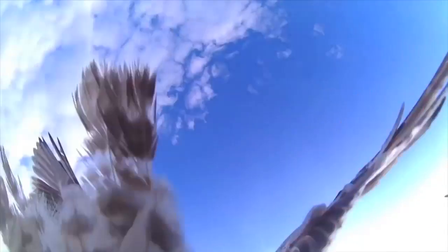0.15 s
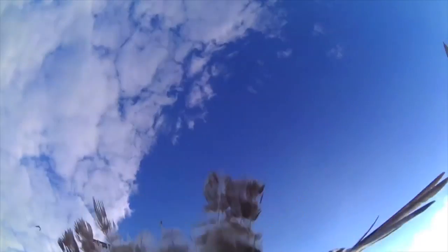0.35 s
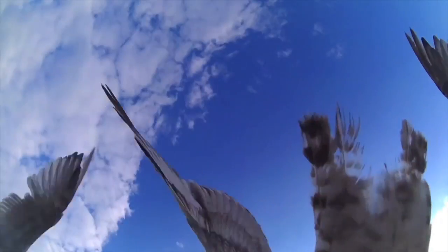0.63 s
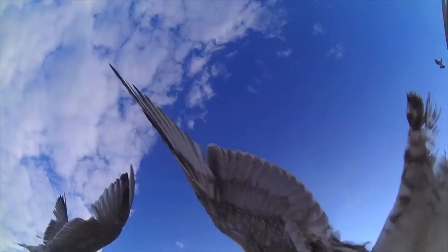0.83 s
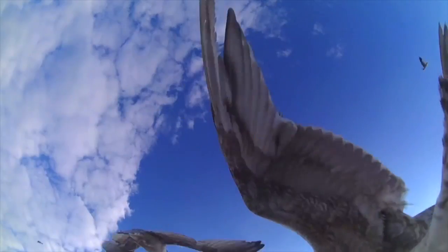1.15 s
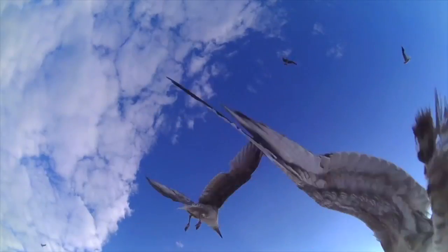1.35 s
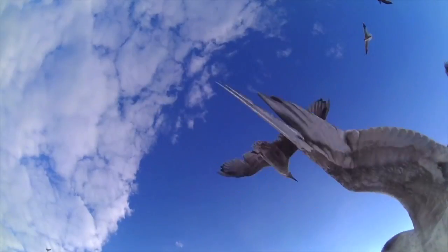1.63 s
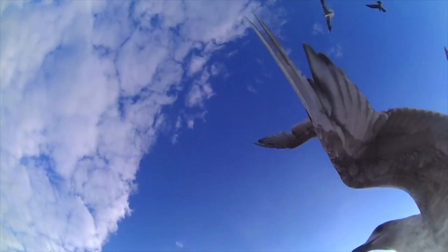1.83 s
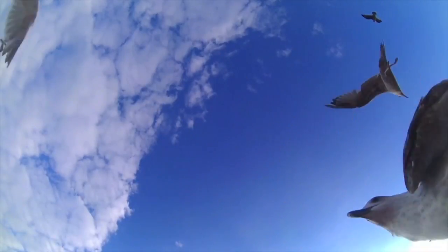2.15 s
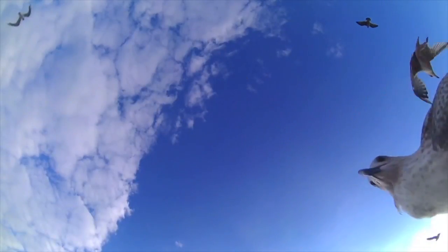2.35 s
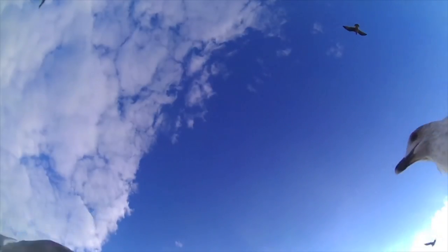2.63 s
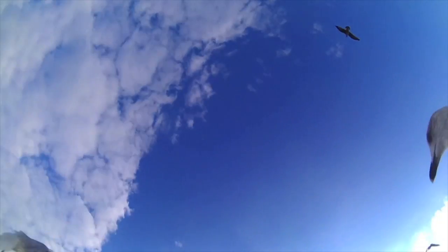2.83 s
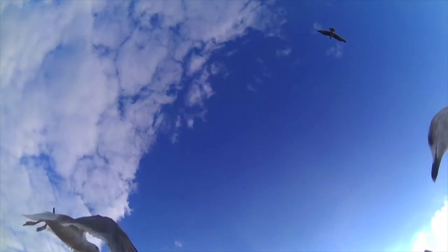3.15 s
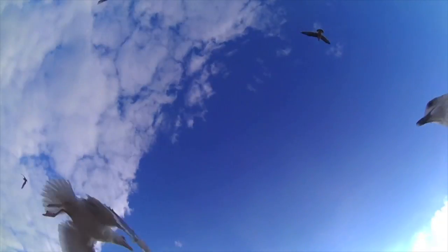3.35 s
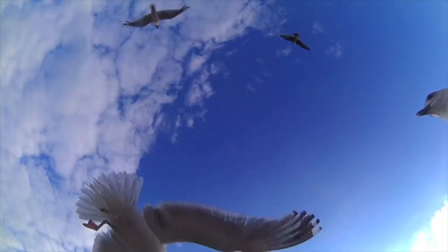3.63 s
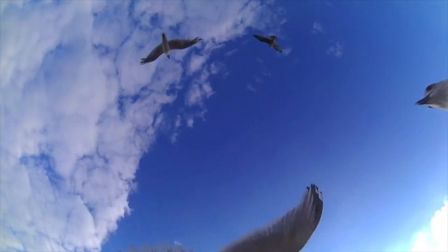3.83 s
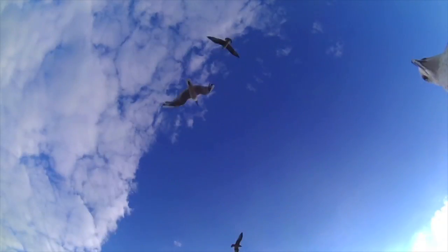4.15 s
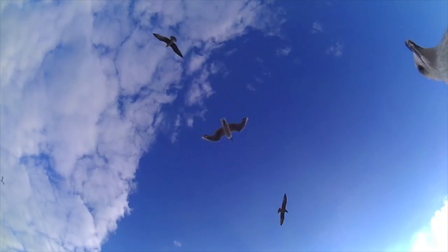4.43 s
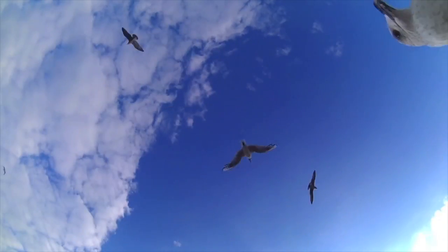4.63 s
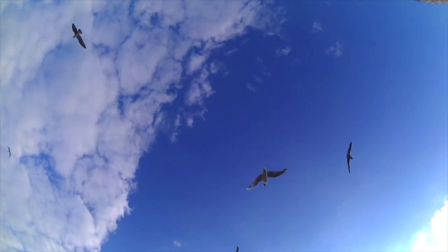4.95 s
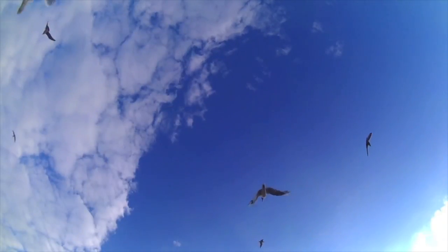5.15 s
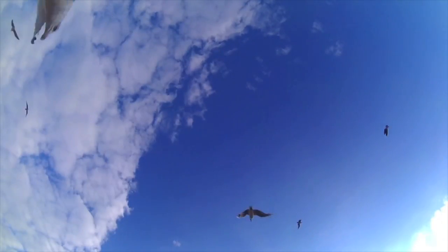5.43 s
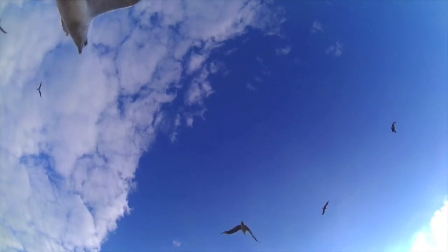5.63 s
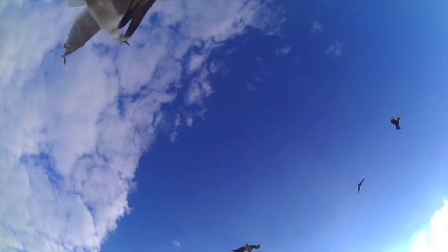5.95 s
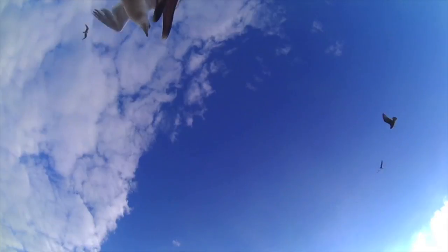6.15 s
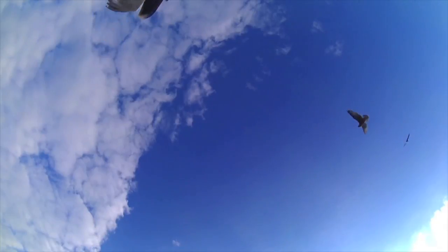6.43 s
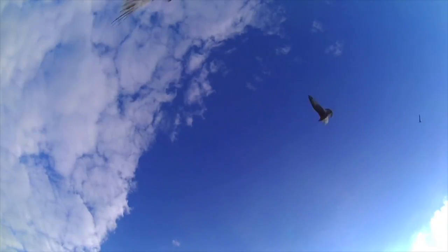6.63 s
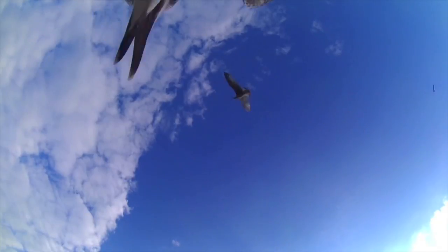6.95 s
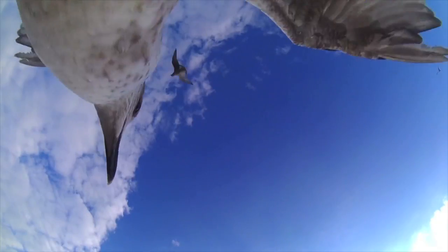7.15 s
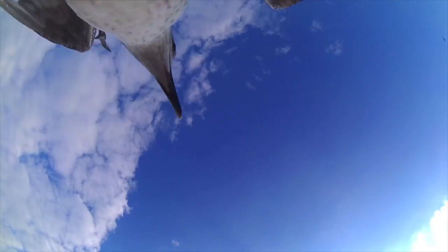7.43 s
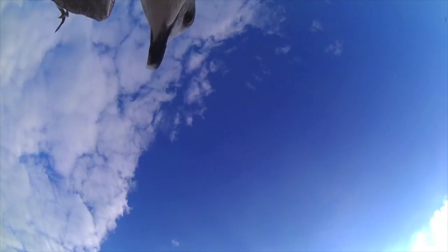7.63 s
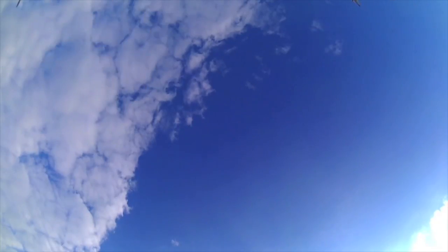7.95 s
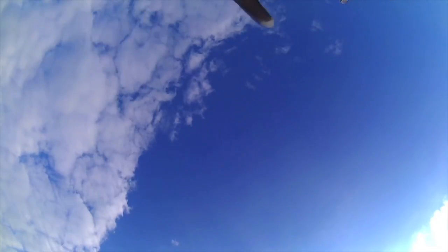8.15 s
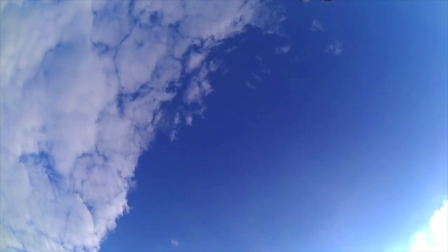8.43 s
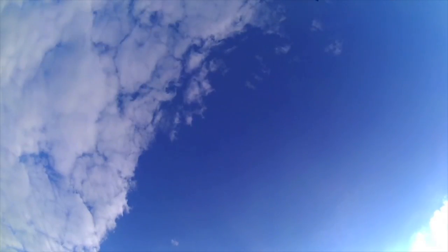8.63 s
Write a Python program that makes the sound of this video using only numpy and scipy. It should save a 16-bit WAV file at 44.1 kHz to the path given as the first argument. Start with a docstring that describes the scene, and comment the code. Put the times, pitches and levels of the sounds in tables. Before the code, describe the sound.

Young gulls whistle and chatter close overhead, over low wind and wing beats, with a few knocks on the microphone.

```python
"""Thin whistles from young gulls hovering close by, and two bursts of hard gull chatter.
A bird's voice box makes the whistles as near-pure tones and the chatter as pulses shaped by its throat.
Below the birds a small camera lies outdoors, facing the sky: a beak raps its case once, and a few
bumps make it thud and buzz. Wind and wing beats make the case hum low, over a faint electronic hiss."""
import sys
import numpy as np
from scipy import signal
from scipy.fft import rfft, irfft, next_fast_len
from scipy.io import wavfile
from scipy.ndimage import uniform_filter1d

SR = 44100
rng = np.random.default_rng(int(sys.argv[2]) if len(sys.argv) > 2 else 0)


def output_pcm(signal):
    """Save a mono or channel-first signal as 16-bit PCM at the path in sys.argv[1].

    Samples are clipped to [-1, 1] before scaling.
    """
    pcm = np.clip(np.atleast_2d(signal).T, -1, 1) * 32767
    wavfile.write(sys.argv[1], SR, np.round(pcm).astype(np.int16))


N = 387638
TIME = np.arange(N) / SR


def gulls(whistle_gain_db=2.5, squeal_gain_db=3.0):
    """All the birds' calls: begging whistles, peeps, one loud squeal and the chatter."""
    # begging calls: start t/s, climb t/s, high t/s, low t/s, opening f/Hz, scoop f/Hz, top f/Hz,
    # low f/Hz, climb level/dB, high level/dB, low level/dB, climb roughness/0-1, later roughness/0-1
    begs = [ (0.341, 0.11, 0.17, 0.050, 2970, -130, 4620, 3820, -48.5, -67, -62, 0.88, 0.37),
            (1.7, 0.1, 0.41, 0.17, 2930, 3, 4720, 3824, -52, -61.5, -48, 0.67, 0.015),
            (3.432, 0.098, 0.466, 0.066, 2870, -4, 4730, 3790, -51, -64, -55, 0.83, 0.1),
            (4.445, 0.085, 0.352, 0.055, 2860, 3, 4900, 4100, -66, -83.5, -67.5, 0.8, 0.75),
            (7.132, 0.094, 0.362, 0.127, 4340, 442, 4540, 3700, -60, -61, -62, 0.01, 0.1)]
    # the flock's peeps: start t/s, length t/s, first f/Hz, last f/Hz, level/dB, roughness/0-1
    peeps = [ (0.523, 0.033, 3750, 3850, -56.5, 0.7), (0.566, 0.036, 4330, 4230, -61, 0.5),
             (0.569, 0.036, 3700, 3660, -58, 0.3), (0.665, 0.049, 4120, 3850, -50.5, 0.07),
             (0.716, 0.036, 4860, 4800, -67, 0.35), (0.750, 0.058, 4380, 4390, -63, 0.45),
             (0.762, 0.032, 3610, 3660, -60, 0.25), (0.796, 0.044, 4050, 3950, -57.5, 0.7),
             (0.802, 0.040, 4380, 4230, -53, 0.56), (0.875, 0.060, 2750, 2580, -63, 0.75),
             (0.881, 0.11, 4400, 4520, -65, 0.9), (0.962, 0.030, 2570, 2430, -61, 0.2),
             (1.010, 0.075, 4130, 3900, -70, 0.2), (2.354, 0.150, 3048, 3110, -74, 0.16),
             (2.708, 0.088, 3700, 3720, -69, 0), (2.960, 0.220, 4500, 4300, -81, 0.2),
             (4.488, 0.069, 3080, 3270, -73, 0.4), (4.494, 0.055, 4120, 4250, -70, 0.85),
             (4.600, 0.160, 3080, 2980, -78, 0.4), (4.852, 0.070, 2900, 3260, -70, 0.4),
             (4.93, 0.022, 3840, 3890, -60, 0.1), (4.957, 0.4, 4530, 4320, -70.5, 0.2),
             (5.14, 0.050, 3000, 3140, -63, 0.3), (5.200, 0.13, 3520, 3360, -64, 0.15),
             (5.307, 0.08, 3700, 3650, -62, 0.2), (5.439, 0.028, 2800, 2740, -64, 0.3),
             (5.468, 0.039, 2730, 2610, -51.5, 0.03), (8.066, 0.023, 4000, 4190, -72, 0.6),
             (8.120, 0.160, 4280, 4000, -81, 0.4), (8.752, 0.038, 2920, 3100, -68, 0.65)]
    # chatter: start t/s, length t/s, level/dB, f/Hz, roughness/0-1, treble lift of the open beak/dB
    syllables = [ (0.155, 0.02, -60, 1850, .05, -15), (0.578, 0.026, -57, 2360, 0.26, 15),
                 (0.595, 0.018, -42.5, 2053, 0.23, 8.5), (0.607, 0.045, -43.5, 370, 0.09, 18.5),
                 (0.641, 0.026, -55, 2900, .01, 5), (0.835, 0.038, -48.5, 305, 0.53, 2),
                 (0.865, 0.022, -48, 364, 0.06, 15), (0.923, 0.021, -47, 377, 0.25, 14),
                 (0.937, 0.015, -40, 258, 0.6, -12), (0.969, 0.019, -51, 616, 0.1, -5),
                 (0.982, 0.031, -48, 346, 0.27, 10), (0.999, 0.031, -50.5, 1816, 0.1, 0),
                 (5.106, 0.023, -35.5, 3040, 0.03, 23.5), (5.48, 0.023, -38.5, 675, 0.14, 3.5),
                 (5.506, 0.039, -36.5, 1310, 0.07, 0.5), (5.551, 0.039, -36, 1271, 0.09, 2),
                 (5.595, 0.043, -33, 1224, 0.09, -1.5), (5.649, 0.047, -35, 275.3, 0.17, 0),
                 (5.693, 0.044, -34, 263.2, 0.03, 0.5), (5.734, 0.047, -36, 267.7, 0.32, -0.5),
                 (5.784, 0.039, -38.5, 253.5, 0.24, -3.5), (5.833, 0.029, -44.5, 254, 0.13, -7)]
    out = np.zeros(N)
    for course in [beg(*row) for row in begs] + [peep(*row) for row in peeps]:
        start, sound = whistle(course)
        add(out, start, amp(whistle_gain_db) * sound)
    start, sound = whistle(squeal())
    add(out, start, amp(squeal_gain_db) * sound)
    for start, *shape in syllables:
        add(out, start, chatter_syllable(*shape))
    return open_air(out)


def whistle(course, beat_hz=610):
    """A near-pure tone. When it is rough, the other side of the voice box beats against it."""
    times, *columns = np.transpose(course)  # a course lists t/s, f/Hz, level/dB, roughness/0-1
    t = np.arange(times[0], times[-1], 1 / SR)
    hz, db, rough = (np.interp(t, times, column) for column in columns)
    rough, count = np.clip(rough, 0, 1), len(t)
    beat = np.cos(2 * np.pi * np.cumsum(beat_hz * (1 + 0.073 * wander(count, 38.5))) / SR)
    shake = (0.0012 + 0.017 * rough) * wander(count, 260)
    phase = 2 * np.pi * np.cumsum(hz * (1 + shake)) / SR + 0.3 * rough * beat
    # the throat passes less of the overtone as the pitch climbs
    overtone_db = -25 - 50 * np.log2(hz / 3500) + 9 * np.minimum(rough, .3)
    tone = np.sin(phase) + amp(np.minimum(overtone_db, -12)) * np.sin(2 * phase)
    flutter = 1 + rough * (0.34 * beat + 0.42 * wander(count, 200))
    cracks_db = rough * (6 * np.tanh(wander(count, 68)) - 2)
    fade = signal.windows.tukey(count, min(1, 0.0051 * SR / count))
    return times[0], np.sqrt(2) * amp(db + cracks_db) * tone * flutter * fade


def beg(start, climb_s, high_s, low_s, open_hz, scoop_hz, top_hz, low_hz,
        climb_db, high_db, low_db, hoarse, rough, count=160):
    """A begging call's course: it climbs hoarsely, cracks to a thin high note, then drops lower."""
    # the high note flips up into a squeak and back: start t/s, length t/s
    flips = [(0.47, 0.03), (3.56, 0.05), (3.656, 0.037), (4.60, 0.21)]
    crack_hz, crack_s, step_hz = 3970, 0.00405, 421
    u = np.linspace(0, 1, count)  # progress through each of the three parts
    shake = unit(uniform_filter1d(rng.standard_normal(count), size=14))
    waver = unit(uniform_filter1d(rng.standard_normal(count), size=36))

    strain = hoarse * (1 - u ** 3)
    rise = open_hz + (crack_hz - open_hz) * u - scoop_hz * np.sin(np.pi * u) + 169 * strain * shake
    # a hoarse climb catches on evenly spaced steps of pitch
    rise -= 0.8 * hoarse * step_hz / (2 * np.pi) * np.sin(2 * np.pi * rise / step_hz)
    climb = [start + climb_s * u, rise, climb_db - 17 * np.sqrt(hoarse) * (1 - u ** 2), strain]

    t = crack_s + (high_s - 2 * crack_s) * u
    times = start + climb_s + t
    flipped = sum(1. * ((times > at) & (times < at + length)) for at, length in flips)
    flip = uniform_filter1d(flipped, size=3)
    sag = top_hz + (low_hz * 1.115 - top_hz) * u ** 0.8 + 24.1 * waver
    # the pitch reaches the top from just below, and rounds off into the drop
    sag *= 1 - 0.05 * np.exp(-t / 0.027) - 0.04 * np.exp((t - t[-1]) / 0.0087)
    swell_db = high_db - 11 * (u / 0.76 - 1) ** 2
    flip_db = flip * (10 - 64 * (1 - flip))  # the voice nearly cuts out on its way in and out of a flip
    high = [times, sag * 1.15 ** flip, swell_db + flip_db, rough + 0.27 * flip]

    fall = low_hz * (1 - 0.02 * u - 0.12 * u ** 7)
    fade_db = low_db - 2.5 * u - 27 * u ** 5
    low = [start + climb_s + high_s + low_s * u, fall, fade_db, np.full(count, rough)]
    return np.hstack([climb, high, low]).T


def peep(start, length, first_hz, last_hz, db, rough, count=12):
    """A peep's course: one glide that swells and fades, shaking in pitch if it is hoarse."""
    u = np.linspace(0, 1, count)
    hz = first_hz + (last_hz - first_hz) * u + 110 * rough * rng.standard_normal(count)
    swell_db = db - 3.5 * (2 * u - 1) ** 2
    return np.transpose([start + length * u, hz, swell_db, np.full(count, rough)])


def squeal(clear_db=-43.5, rough_per_db=0.2):
    """The closest bird's course: hoarser where it is weaker, and never clean once its voice breaks."""
    # the squeal before the break: t/s, f/Hz, level/dB
    clean = [(5.135, 3700, -65), (5.137, 3770, -59), (5.209, 4000, -52), (5.219, 4070, -44),
             (5.265, 3976, -36), (5.291, 3891, -36), (5.312, 3870, -42)]
    # and after the break: t/s, f/Hz, level/dB
    broken = [(5.312, 3240, -41.5), (5.33, 3240, -50), (5.336, 3250, -44), (5.346, 3210, -46),
              (5.354, 3280, -61), (5.378, 3200, -50), (5.426, 3180, -59), (5.44, 3190, -75)]
    times, hz, db = np.transpose(clean + broken)
    least_rough = np.repeat([0.04, 0.21], [len(clean), len(broken)])
    rough = np.clip((clear_db - db) * rough_per_db, least_rough, 0.7)
    return np.transpose([times, hz, db, rough])


def chatter_syllable(length, db, hz, rough, lift_db):
    """Voice box pulses, fast in a yelp and slow in a rattle, pass with puffs of air through the throat."""
    # how the gull's throat colours its voice: f/Hz, level/dB
    throat = [(650, -46), (1080, -22.5), (1320, -9), (1580, -17.5), (1870, 5), (2130, -6), (2420, -2.5),
              (2700, -18), (2940, -2.5), (3450, -30.5), (4050, -9.5), (4600, -25), (5200, -24),
              (9000, -59.5)]
    count = int(length * SR)
    u = np.linspace(-1, 1, count)
    force = signal.windows.tukey(count, min(1, 0.017 / length)).clip(0, 1)
    rattle = float(hz < 500)  # slow pulses are uneven, and sink in pitch and force as the air runs out
    arch = length * (1 / 8 - u ** 2)  # longer syllables arch further in pitch
    droop = (0.011 + 0.012 * rattle) * u
    cycles = np.cumsum(hz * (1 + arch - droop + 0.11 * rough * wander(count, 300))) / SR
    pulses = np.zeros(count)
    for k in range(1, int(8000 / hz) + 1 + (not rattle)):
        height = k * hz / 2200  # high overtones sound only at full force, and are the least steady
        strength = force ** height * amp(5.5 * min(height / 2, 1) * wander(count, 44))
        sweep = .0008 * (k * hz) ** 2 / 2000  # each pulse is a short upward sweep
        slip = rattle * 0.3 * height * wander(count, 90)
        pulses += strength * np.cos(2 * np.pi * (k * cycles - sweep) + slip)
    puffs = force * np.exp(-(cycles % 1) / .5) * rng.standard_normal(count)
    puffs = unit(puffs - 2.7 * np.gradient(np.gradient(puffs)))  # brightens the rasp
    drive = (1 - rough) * unit(pulses) + 0.97 * (1 + rattle) * rough * puffs
    drive *= amp(rattle * (wander(count, 230) - 4 * u))

    def throat_and_beak_db(f):
        """An open beak lifts the treble; a closing one dulls it and the middle tones too."""
        treble = lift_db * curve([(2900, 0), (3700, 1), (4400, 1.0), (6000, 0.8)], f)
        middle = 2.5 * min(lift_db, 0) * curve([(2100, 0.028), (2900, 1.0), (4000, 0.3)], f)
        return curve(throat, f) + treble + middle

    voice = colour(drive, throat_and_beak_db)
    return amp(db) * voice / np.sqrt(np.sum(voice ** 2) / count)


def open_air(x, echo_db=-25, decay_s=0.21):
    """Adds weak scattered echoes from the ground and nearby walls."""
    t = np.arange(SR // 2) / SR
    echoes = rng.standard_normal(len(t)) * (rng.random(len(t)) < 2000 / SR)
    echoes *= (t > .004) * amp(-60 * t / decay_s)
    return x + amp(echo_db) * signal.fftconvolve(x, echoes / np.linalg.norm(echoes))[:N]


def peck(top_hz=10800, snap_db=-20):
    """A hard beak raps the case: its shell rings, and the contact adds a thin snap on top."""
    # the shell's ringing tones: f/Hz, level/dB, time to fade by 60 dB/s
    shell_tones = [(1330, -14, 0.021), (1770, -9.5, 0.013), (2940, -6.5, 0.015), (3760, -0.5, 0.0044),
                   (4740, -3.5, 0.011), (6050, -5, 0.012), (7300, -3.5, 0.005), (8870, -2, 0.0074),
                   (10320, -7, 0.005)]
    # the two tips of the beak land: t/s, level/dB
    beak_tips = [(0.8404, -20), (0.8417, -29)]
    out = np.zeros(N)
    shell = ring(shell_tones[::2]) - ring(shell_tones[1::2])  # neighbouring tones swing opposite ways
    soft = signal.sosfilt(signal.butter(8, top_hz, fs=SR, output="sos"), shell)
    for start, db in beak_tips:
        add(out, start, amp(db) * (soft + amp(snap_db) * shell))
    return out


def bumps(thud_rise_s=0.0046, scuff_rise_s=0.0013):
    """Each bump rings the case with a thud and scuffs its surface."""
    # bumps: t/s, thud level/dB, scuff level/dB, scuff time to fade by 60 dB/s,
    # scuff tilt/dB per octave, scuff top f/Hz
    knocks = [ (0.006, -24, -45, 0.14, -2.5, 3000), (0.029, -29, -40, 0.037, -5, 2500),
              (0.503, -26, -81, .05, 1, 2500), (2.481, -38, -50, 0.053, -9, 6000),
              (2.510, -55, -49, 0.065, -10.5, 2500), (2.662, -30, -44, 0.11, -6, 6000),
              (3.278, -38.5, -70, .05, -3, 2520), (5.194, -40, -50, .1, -12, 2500),
              (6.953, -28.5, -45.5, 0.37, -6, 3000), (6.979, -29, -36, 0.26, -5.5, 11000),
              (7.054, -45, -38, 0.039, -2, 2490), (7.305, -43, -50, .15, -5, 4500),
              (7.817, -22.5, -35, 0.12, -8, 4020), (7.875, -39, -31.5, 0.011, 5, 3980),
              (7.928, -62, -39, 0.024, -0.5, 3760)]
    # the case's ringing tones: f/Hz, level/dB, time to fade by 60 dB/s
    case_tones = [(129, -30, 0.054), (225, 9.5, 0.052), (310, -5.5, 0.063), (456, -11, 0.05),
                  (537, -37, 0.01), (1830, -32.5, 0.078), (3020, -36.5, 0.11)]
    # the colour of a scuff: f/Hz, level/dB
    scuff_colour = [(150, -14), (450, 1.5), (900, -2), (1100, -4.5), (1350, 4.5), (1600, 1), (1870, -1.5),
                    (2400, -8.5), (3050, -17), (3500, -7), (4000, -7), (5200, -6), (9000, -14),
                    (15000, -25)]
    out, t = np.zeros(N), np.arange(SR // 4) / SR
    thud = 1.05 * ring(case_tones) * (1 - np.exp(-t / thud_rise_s))
    for start, thud_db, scuff_db, decay_s, tilt_db, top_hz in knocks:
        def shade_db(f):
            """This scuff's colour: tilted, and cut away above its top."""
            tilt = tilt_db * np.log2(np.clip(f, 400, 4500) / 1800)
            return curve(scuff_colour, f) + tilt - 45 * np.log2(np.clip(f / top_hz, 1, 2.5))

        scuff = unit(colour(rng.standard_normal(len(t)), shade_db)[:len(t)])
        envelope = amp(scuff_db - 60 * t / decay_s) * (1 - np.exp(-t / scuff_rise_s))
        add(out, start, amp(thud_db) * thud + envelope * scuff)
    return out


def buzzes(flicker_db=4.0):
    """During the last quick clatter of knocks, loose contacts rattle and make the case buzz briefly."""
    # buzzes: start t/s, level/dB, time to fade by 60 dB/s
    bursts = [(7.819, -43.5, 0.2), (7.876, -37, 0.029), (7.929, -47, 0.039)]
    # the narrow peaks at which the case buzzes: f/Hz, level/dB
    buzz_colour = [(1300, -24), (1700, -8), (1860, 7.5), (2050, -17), (2550, -26), (2850, -11), (3020, -3),
                   (3250, -17), (3600, -24), (3950, -14), (4400, -33), (7000, -47)]
    out, t = np.zeros(N), np.arange(SR // 4) / SR
    for start, db, decay_s in bursts:
        contacts = rng.standard_normal(len(t)) * amp(flicker_db * wander(len(t), 150))
        buzz = unit(colour(contacts, lambda f: curve(buzz_colour, f))[:len(t)])
        add(out, start, amp(db - 60 * t / decay_s) * buzz)
    return out


def wind_and_wings(breeze_hum_gain_db=0.5, rumble_db=-63):
    """Breeze and wing beats blow on the case: its hollow hums and the air swishes, over a rumble."""
    # the breeze: t/s, hum level/dB, swish level/dB
    breeze = [(0.0, -38, -49.5), (0.41, -41.5, -61), (0.88, -43, -54.5), (1.13, -45.5, -63),
              (1.91, -49.5, -64.5), (2.05, -46, -65.5), (2.59, -50.5, -62), (2.84, -54, -63.5),
              (3.99, -53, -66.5), (4.77, -49.5, -64.5), (5.51, -53.5, -62.5), (5.85, -47, -61),
              (6.22, -50.5, -65.5), (6.85, -46.5, -63.5), (7.17, -50, -58.5), (7.91, -50.5, -63.5),
              (8.2, -55, -63.5), (8.79, -53, -66)]
    # close wing beats: middle t/s, length t/s, hum level/dB, swish level/dB
    wingbeats = [ (0.035, 0.07, -33.5, -61), (0.162, 0.19, -45, -71), (0.728, 0.053, -39, -55),
                 (0.83, 0.2, -39.5, -57), (1.343, 0.17, -43, -72), (1.91, 0.2, -45.5, -69),
                 (2.262, 0.11, -42, -71), (2.353, 0.09, -47, -58), (2.547, 0.23, -46.5, -59),
                 (2.78, 0.2, -46.5, -60.5), (3.076, 0.14, -45, -64), (3.314, 0.15, -44.5, -67),
                 (3.526, 0.27, -44, -63), (3.738, 0.11, -45.5, -72), (3.974, 0.13, -40, -70),
                 (4.224, 0.077, -43.5, -75), (4.47, 0.24, -45.5, -63), (4.69, 0.12, -46, -64),
                 (4.823, 0.12, -42.5, -59.5), (4.955, 0.21, -42, -59.5), (5.25, 0.18, -37.5, -49.5),
                 (5.348, 0.15, -47.5, -59.5), (5.602, 0.17, -45, -66), (5.854, 0.12, -43, -68),
                 (6.002, 0.16, -44, -59), (6.35, 0.14, -41, -63), (6.467, 0.15, -43.5, -70),
                 (6.61, 0.068, -44, -69), (6.868, 0.52, -41, -65), (7.24, 0.058, -45.5, -52.5),
                 (7.435, 0.29, -40, -57.5), (7.658, 0.12, -43, -66), (8.008, 0.1, -48.5, -65),
                 (8.104, 0.19, -45, -66)]
    # the colour of the hollow case's hum: f/Hz, level/dB
    hum_colour = [(20, -42), (50, -20), (75, -26.5), (105, -20.5), (135, -5.5), (165, -9.5), (200, -4.5),
                  (235, 2), (280, -8.5), (340, -16.5), (480, -20), (650, -48), (1200, -67)]
    # the colour of the swishing air: f/Hz, level/dB
    swish_colour = [(250, -3), (480, 4.5), (650, -1.5), (900, -4), (1100, -11), (1350, -9.5), (1600, -15),
                    (1850, -14), (2400, -23), (4000, -18), (8000, -25), (16000, -43)]
    times, hum_db, swish_db = np.transpose(breeze)
    hum_power = amp(np.interp(TIME, times, hum_db) + breeze_hum_gain_db) ** 2
    swish_power = amp(np.interp(TIME, times, swish_db)) ** 2
    for middle, length, beat_hum_db, beat_swish_db in wingbeats:
        push = signal.windows.hann(int(length * SR))
        add(hum_power, middle - length / 2, (amp(beat_hum_db) * push) ** 2)
        add(swish_power, middle - length / 2, (amp(beat_swish_db) * push) ** 2)
    gust_db = wander(N, 25.0)
    hum = np.sqrt(hum_power) * amp(gust_db) * noise(hum_colour)
    feather_db = 1.5 * wander(N, 70)
    swish = np.sqrt(swish_power) * amp(gust_db + feather_db) * noise(swish_colour)
    rumble = amp(rumble_db) * noise([(20, -13.5), (52, -3.5), (80, -6.0), (200, -21.5), (800, -66)])
    return (hum + swish + rumble) * np.minimum(TIME / 0.0012, 1)


def electronics(hiss_db=-68, sizzle_db=-67, whine_hz=13367, whine_db=-81):
    """The camera's even hiss, with a sizzle and a thin whine that come and go together."""
    # the colour of the hiss: f/Hz, level/dB
    hiss_colour = [(100, -18), (1000, 8), (3000, 2.5), (5000, -1.5), (7000, -3), (10000, -4.5),
                   (12000, -1.5), (13500, -1), (15800, -12.5)]
    # the colour of the sizzle: f/Hz, level/dB
    sizzle_colour = [(4500, -24), (5600, -2.5), (6600, 8.5), (7250, -1), (7700, 5), (9000, -7),
                     (10200, -12), (11900, -1.5), (12800, -18), (13450, 8), (14300, -21), (14900, 6),
                     (15500, -5.5)]
    hiss = amp(hiss_db) * noise(hiss_colour)
    gate = sizzle_gate()
    sizzle = amp(sizzle_db) * noise(sizzle_colour)
    whine = amp(whine_db) * np.sqrt(2) * np.sin(2 * np.pi * whine_hz * TIME)
    return hiss + gate * (sizzle + whine)


def sizzle_gate(first_pause_s=0.535, pause_s=0.12, blink_chance=0.65, blink_s=0.045):
    """1 while the sizzle sounds: it pauses once a second, and often blinks off at the quarters between."""
    on = np.ones(N)
    for quarter in range(-1, int(4 * N / SR)):
        chance, size = rng.random(2)
        length = pause_s if quarter % 4 == 0 else (chance < blink_chance) * blink_s * (.5 + size)
        on[abs(TIME - first_pause_s - quarter / 4) < length / 2] = 0
    return uniform_filter1d(on, size=300)


def amp(db):
    """Turns decibels into a gain."""
    return 10 ** (np.asarray(db) / 20)


def unit(x):
    """Scales a signal to an average power of 1."""
    return x / np.sqrt(np.mean(x ** 2) + 1e-20)


def curve(points, hz):
    """The value at hz of points joined by straight lines, with octaves evenly spaced."""
    f, values = np.transpose(points)
    return np.interp(np.log(hz + 1), np.log(f), values)


def add(mix, start, sound):
    """Lays a sound into the mix at a start time in seconds."""
    part = mix[max(round(start * SR), 0):][:len(sound)]
    part += sound[:len(part)]


def colour(x, gain_db, size=4096):
    """Filters x by the curve gain_db(hz), ringing only after each sound and never before it."""
    log_gain = np.log(amp(gain_db(abs(np.fft.fftfreq(size, 1 / SR)))))
    taps = np.fft.ifft(np.exp(np.conj(signal.hilbert(log_gain)))).real
    return signal.fftconvolve(x, taps[:size // 2])


def noise(points):
    """Steady noise of power 1, coloured by points of f/Hz, level/dB."""
    size = next_fast_len(N)
    hz = np.fft.rfftfreq(size, 1 / SR)
    return unit(irfft(rfft(rng.standard_normal(size)) * amp(curve(points, hz)), size)[:N])


def wander(count, hz):
    """Random drift of about size 1, mostly slower than hz."""
    size = next_fast_len(count + SR // 4)
    f = np.fft.rfftfreq(size, 1 / SR)
    return unit(irfft(rfft(rng.standard_normal(size)) / (1 + (f / hz) ** 4), size))[:count]


def ring(tones):
    """The dying tones of a struck object."""
    t = np.arange(SR // 4) / SR
    return sum(amp(db - 60 * t / decay_s) * np.sin(2 * np.pi * hz * t) for hz, db, decay_s in tones)


def scene():
    """Birds, air, knocks and hiss together in one channel."""
    return (gulls() + wind_and_wings() + bumps() + buzzes() + peck() + electronics())[None]


def record(dry, top_hz=15800):
    """The camera cuts off the highest treble."""
    lowpass = signal.firwin(511, top_hz, window=("kaiser", 9), fs=SR)
    return signal.oaconvolve(dry, lowpass[None], "same")


dry = scene()
out = record(dry)
output_pcm(out)
```